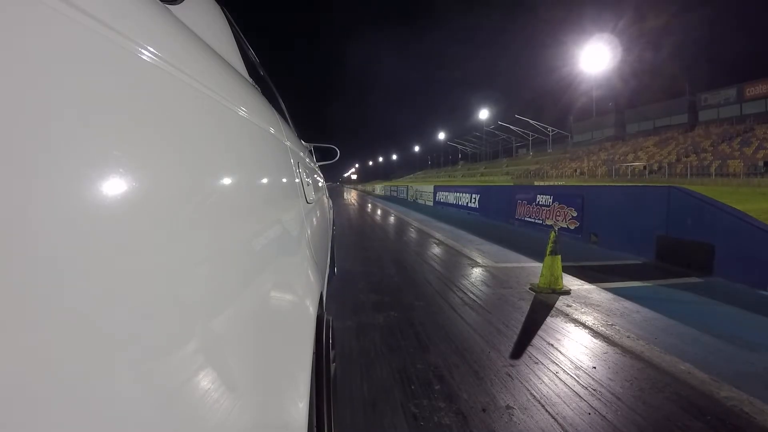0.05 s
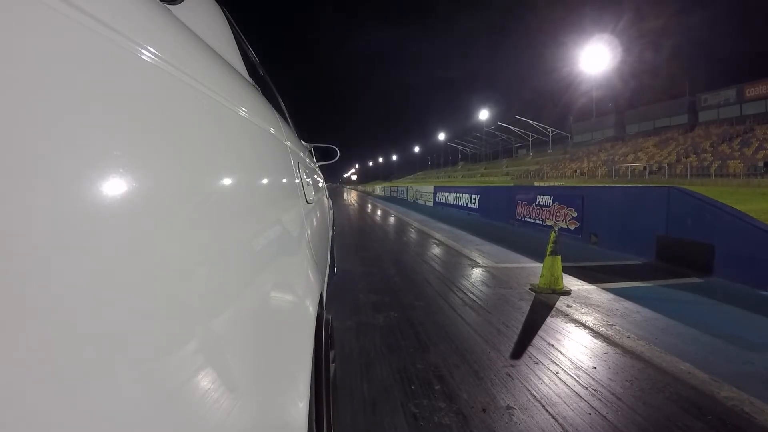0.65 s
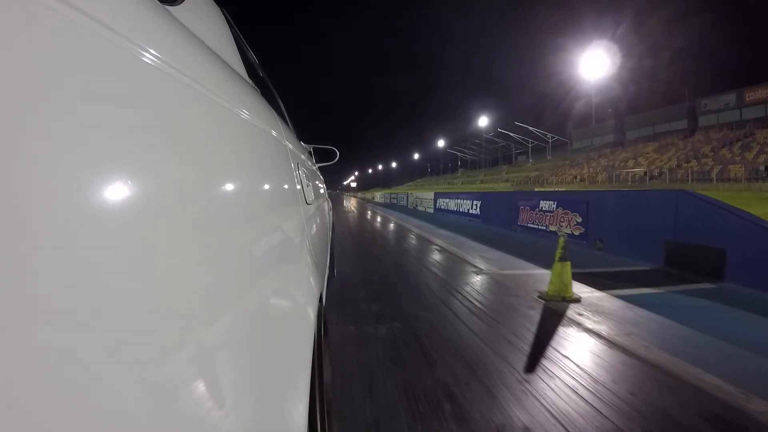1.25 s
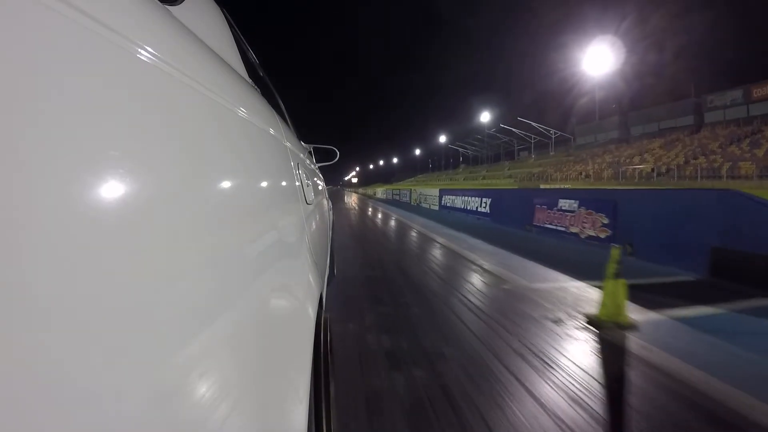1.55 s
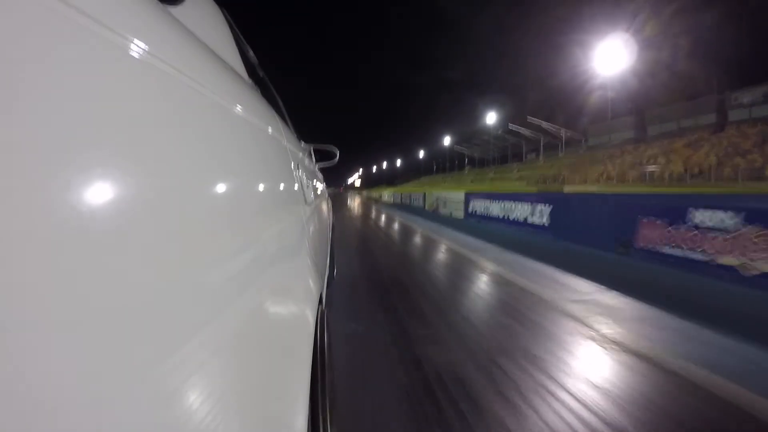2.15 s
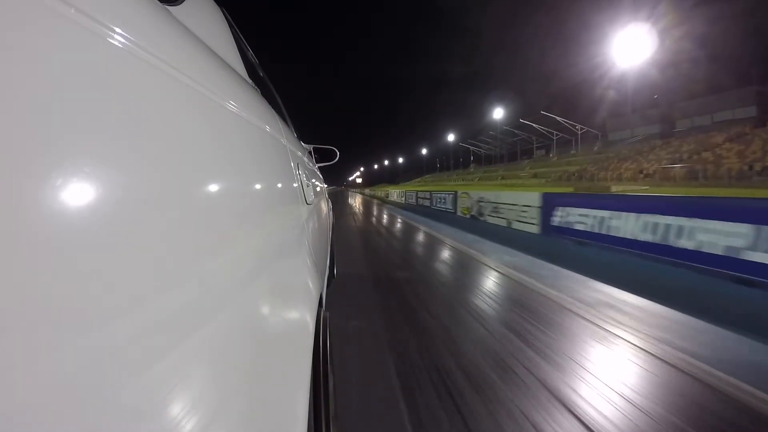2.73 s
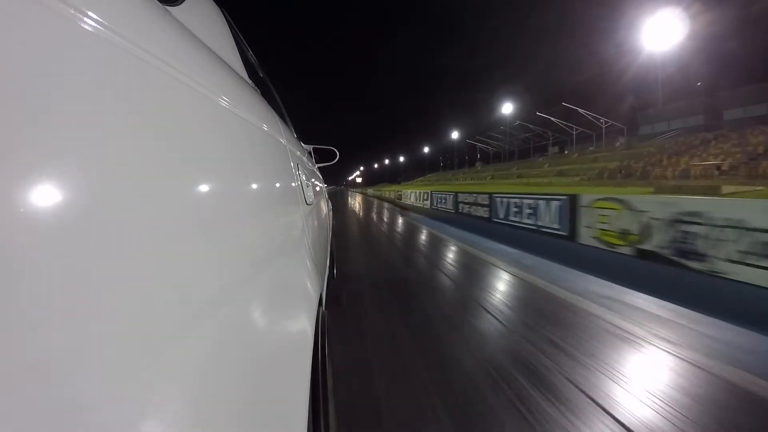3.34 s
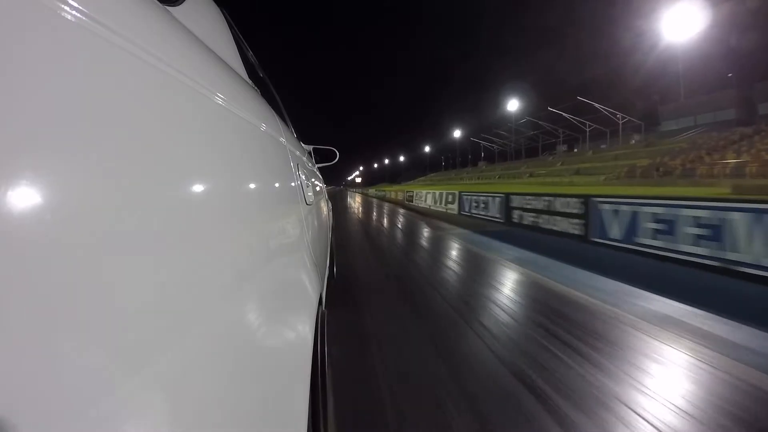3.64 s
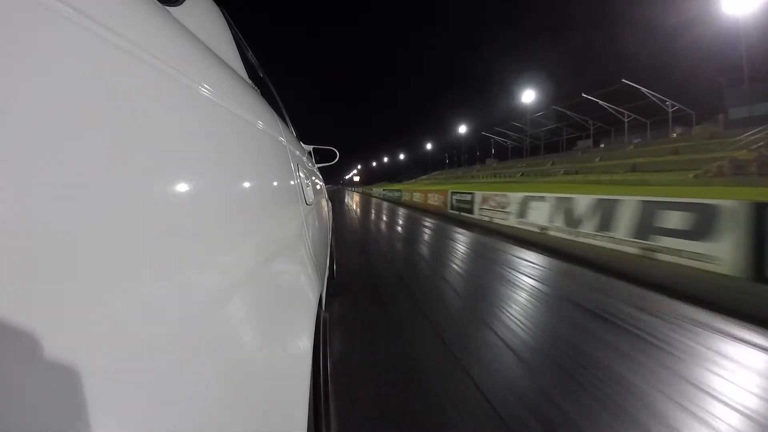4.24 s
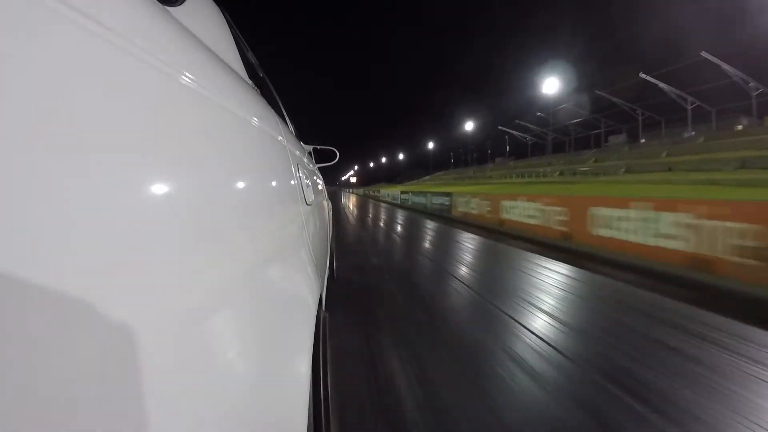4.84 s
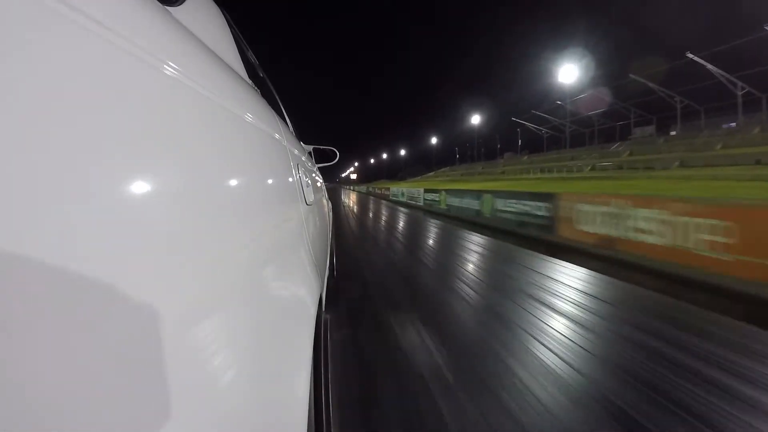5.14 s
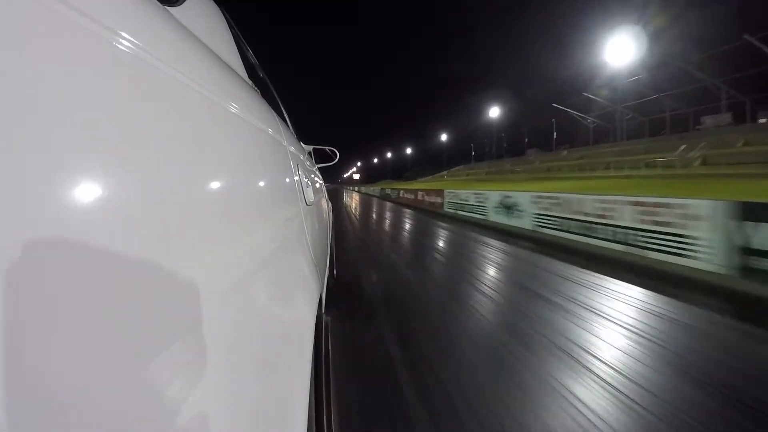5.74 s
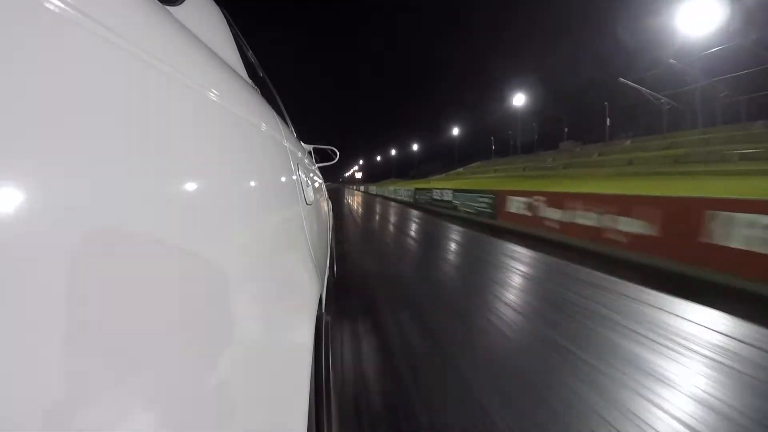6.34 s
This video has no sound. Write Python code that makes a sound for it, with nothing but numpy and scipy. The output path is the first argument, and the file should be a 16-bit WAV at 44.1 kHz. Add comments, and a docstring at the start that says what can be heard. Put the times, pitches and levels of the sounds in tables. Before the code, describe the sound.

A car engine drones, the tyres chirp, and it accelerates hard through a gear change as wind noise builds.

```python
"""A six-cylinder car launches down a drag strip, heard from a cased camera stuck on its side.
First the exhaust drones at the start line while the camera shudders on its mount.
Just after a second, a tyre sticks and slips in short chirps. Then the revs climb, a faint turbo
whistles, and growing wind buffets the camera and hisses in the resonances of its case.
Near 4.6 s the revs drop and the exhaust splutters at the gear change; a slower climb follows."""
import sys
import numpy as np
from scipy import signal
from scipy.fft import rfft, irfft
from scipy.io import wavfile
from scipy.ndimage import uniform_filter1d

SR = 44100
rng = np.random.default_rng(int(sys.argv[2]) if len(sys.argv) > 2 else 0)


def digitize_waveform(pressure):
    """Quantize a signal to 16-bit integers and store it at the path in sys.argv[1].

    Rows of a 2-D input are taken as channels; values are limited to [-1, 1].
    """
    field = np.atleast_2d(pressure).T
    bounded = np.clip(field, -1, 1)
    quanta = np.round(bounded * 32767).astype(np.int16)
    wavfile.write(sys.argv[1], SR, quanta)


N = 290178
TIME = np.arange(N) / SR
BINS_HZ = np.fft.rfftfreq(N, 1 / SR)


def gain_of(db):
    """Turns decibels into a number to multiply by."""
    return 10 ** (np.asarray(db) / 20)


def evened(x):
    """Scales a signal so that its average size (rms) is 1."""
    return x / np.sqrt(np.mean(x ** 2) + 1e-20)


def curves(rows):
    """Joins the rows of a timed table with straight lines: one curve for each column after time."""
    times, *columns = np.transpose(rows)
    return [np.interp(TIME, times, column) for column in columns]


def response(spectrum, hz):
    """Looks up how strongly a spectrum lets each frequency through."""
    points_hz, db = np.transpose(spectrum)
    return gain_of(np.interp(np.log(hz + 1), np.log(points_hz + 1), db))


def coloured(x, spectrum):
    """Filters a signal by a spectrum."""
    return irfft(rfft(x) * response(spectrum, BINS_HZ), N)


def noise(spectrum):
    """Noise of average size 1 with the given spectrum."""
    return evened(coloured(rng.standard_normal(N), spectrum))


def wander(rate_hz):
    """A random wobble of average size 1, no faster than about the given rate."""
    return evened(irfft(rfft(rng.standard_normal(N)) * np.exp(-(BINS_HZ / rate_hz) ** 2), N))


# The turbocharger's whistle: time_s, pitch_hz, level_db
TURBO_WHISTLE = [(.9, 5900, -77), (1.25, 5890, -60), (2.2, 6500, -59.5), (3.7, 6400, -53.5),
                 (3.95, 7553, -64), (4.2, 8210, -55), (4.38, 8590, -47), (4.6, 9180, -74)]

def turbo():
    """A faint, airy whistle climbs with the boost and dies at the gear change."""
    hz, db = curves(TURBO_WHISTLE)
    airy = wander(rate_hz=380) + 1j * wander(rate_hz=380)  # blurs the pure tone
    return gain_of(db) * (airy * np.exp(2j * np.pi * np.cumsum(hz) / SR)).real


# Air rushing over the camera, growing with road speed: time_s, level_db
AIR_RUSH = [(0, -37), (2.4, -22.5), (2.85, -13.5), (3.22, -9), (3.4, -11.5), (3.7, -4), (3.95, -7),
            (4.2, -3.5), (4.95, -2.5), (5.28, 1.5), (5.6, -0.5), (6.35, -1), (6.58, 1.5)]
# Wind ringing in the camera case: frequency_hz, level_db
CASE_HISS = [(300, -2), (650, -35), (900, -5.5), (1300, -7), (1900, -5), (2400, 3.5), (2900, -7),
             (3550, 0.5), (4050, -3.5), (4500, -15), (5000, -23.5), (6200, -19), (7200, -32.5),
             (12000, -42.5)]
# The wind's highest fizz: frequency_hz, level_db
CASE_FIZZ = [(3820, -32.5), (6500, -9), (7280, -5.5), (8300, 1.5), (9290, -5.5), (10100, 0), (11000, -8.5),
             (12500, -5.5), (13500, -11), (15100, -14.5)]

def wind(hiss_db=-20, fizz_db=-46, flicker_db=1.42, swell_db=0.45):
    """Air tears past the case, louder with speed; its swirls shake hiss and fizz together."""
    air_db = curves(AIR_RUSH)[0]
    swirls_db = flicker_db * wander(rate_hz=160) + swell_db * wander(rate_hz=30)
    hiss = gain_of(hiss_db) * noise(CASE_HISS)
    fizz = gain_of(fizz_db) * noise(CASE_FIZZ)
    return gain_of(air_db + swirls_db) * (hiss + fizz)


def shaking(rest_db, speed_db, air_share, launch_s=1.5, settle_db_per_s=9):
    """Strength of a shake: a tremble that settles after launch, plus a part that grows with the wind."""
    tremble = gain_of(rest_db - settle_db_per_s * np.maximum(TIME - launch_s, 0))
    air_push = gain_of(speed_db + air_share * curves(AIR_RUSH)[0])
    return np.hypot(tremble, air_push)


# The deep rumble of air and road: frequency_hz, level_db
RUMBLE = [(12, -13), (25, -3.5), (50, 3), (80, 2), (130, -4), (220, -18.5), (400, -18), (900, -48.5),
          (2000, -57.5)]

def buffet(lumpy_db=0.46):
    """Lumps of air and road rumble push on the camera."""
    strength = shaking(rest_db=-29, speed_db=-19, air_share=0.72)
    return strength * gain_of(lumpy_db * wander(rate_hz=8.5)) * noise(RUMBLE)


# Jolts that set the camera rocking: peak_s, length_s, level_db
MOUNT_JOLTS = [(0.55, 0.4, -19), (0.864, 0.29, -17), (1.082, 0.12, -19), (1.891, 0.31, -16.5),
               (2.17, 0.38, -10), (4.74, 0.16, -13), (6.52, 0.13, -13)]

def shudder(mount_hz=36, stray=0.05, uneven_db=4):
    """The camera rocks on its mount at one low pitch: unevenly with speed, swelling at each jolt."""
    rocking = shaking(rest_db=-35, speed_db=-18.5, air_share=0.7)
    rocking *= gain_of(uneven_db * wander(rate_hz=8))
    for peak_s, length_s, level_db in MOUNT_JOLTS:
        swell = np.cos(np.pi * np.clip((TIME - peak_s) / length_s, -0.5, 0.5))
        rocking = np.maximum(rocking, gain_of(level_db) * swell)
    cycles = np.cumsum(mount_hz * (1 + stray * wander(rate_hz=7.8))) / SR
    return np.sqrt(2) * rocking * np.sin(2 * np.pi * cycles)


# Tyre chirps: start_s, length_s, start_pitch_hz, end_pitch_hz, level_db, loss_per_harmonic_db
TYRE_CHIRPS = [(1.124, 0.038, 1283, 1450, -33, 3), (1.202, 0.029, 1390, 1610, -23.5, 15),
               (1.364, 0.051, 1266, 1140, -16, 7), (1.426, 0.076, 1248, 1122, -17.5, 1.5),
               (1.474, 0.062, 1348, 1211, -17.5, 12), (1.511, 0.06, 1254, 1134, -19, 1.5)]
# A squeal's harmonics (whole multiples of its pitch), before that loss: harmonic_number, level_db
SQUEAL_TONES = [(1, -0.5), (2, -6), (3, -19), (4, -29), (5, -37)]
# Rubber scuffing under each chirp: frequency_hz, level_db
RUBBER_SCUFF = [(500, -29.5), (850, -14.5), (1250, -14), (1750, -7), (2300, 15), (2850, -10), (3500, 8.5),
                (4100, 0), (4900, -18), (6200, -17.5), (8000, -29), (15000, -49)]

def tyre(jitter=0.032, rise_s=0.0032, fade_db=8, grain_db=-3, scuff_db=-6):
    """The tread sticks and slips in short, unsteady squeals over a scuffing noise."""
    waver = 1 + jitter * wander(rate_hz=620)
    grain = gain_of(grain_db * wander(rate_hz=51))
    scuff = gain_of(scuff_db) * noise(RUBBER_SCUFF)
    chirps = np.zeros(N)
    for start_s, length_s, start_hz, end_hz, level_db, loss_db in TYRE_CHIRPS:
        on = (TIME > start_s) & (TIME < start_s + length_s)
        t = TIME[on] - start_s
        cycles = np.cumsum(np.interp(t, [0, length_s], [start_hz, end_hz]) * waver[on]) / SR
        soft_ends = np.minimum(np.minimum(t, length_s - t) / rise_s, 1)
        slip = soft_ends * gain_of(level_db - fade_db * t / length_s)
        squeal = sum(gain_of(db - loss_db * (k - 1)) * np.sin(2 * np.pi * k * cycles)
                     for k, db in SQUEAL_TONES)
        chirps[on] += slip * (np.sqrt(2) * squeal + gain_of(-loss_db) * scuff[on])
    return chirps * grain


# Sound bouncing off the track, the car body and the side wall: delay_s, gain
BOUNCES = [(.0047, 0.37), (.0093, -0.094), (0.0146, -0.12), (0.0208, 0.18)]

def echoed(x):
    """Near surfaces add quick echoes, which strengthen some pitches and weaken others."""
    return x + sum(gain * np.interp(TIME - delay_s, TIME, x) for delay_s, gain in BOUNCES)


# Narrow spots where echoes add to a tone or cancel it: centre_hz, width_hz, gain_db
PEAKS_AND_DIPS = [(199, 5, -3.5), (238, 5, -10.5), (243, 2.3, 1), (323.3, 11, -5), (480.3, 7.5, -9),
                  (524.7, 3.9, -13), (716, 14, 3), (810.3, 8.4, -9.5), (850, 6.5, 3), (878.7, 5.6, -13),
                  (922, 5.3, -11), (945.3, 16, 9.5), (1029, 7.3, 5)]

def echo_gain_db(hz):
    """A tone swells and fades as its pitch slides through the peaks and dips."""
    return sum(db * np.exp(-((hz - centre) / width) ** 2) for centre, width, db in PEAKS_AND_DIPS)


# The engine's mechanical rasp: frequency_hz, level_db
ENGINE_RASP = [(710, -38.5), (1200, -13), (1450, -2.5), (1740, -6.5), (2060, -2.5), (2240, -7.5),
               (2410, -2.5), (2600, -9.5), (3920, -9), (5100, -29.5), (6440, -26.5), (7230, -34),
               (15000, -63.5)]

def rasp(fired, level_db=-35, throb=0.32):
    """Valve noise and gas hiss pulse each time a cylinder fires."""
    level = gain_of(level_db + 2 * wander(rate_hz=15))
    pulses = noise(ENGINE_RASP) * (1 + throb * np.cos(2 * np.pi * fired))
    return level * evened(echoed(pulses))


# Revs held at the line, climbing, dropping at the gear change, climbing again: time_s, firing_rate_hz
ENGINE_REVS = [(0, 138), (0.25, 144.6), (0.52, 150.9), (1.2, 165.5), (1.43, 163.9), (1.68, 173.8),
               (2.05, 179.7), (2.42, 181.1), (2.72, 197), (3.2, 238), (3.55, 272.2), (4.15, 325.4),
               (4.52, 350.3), (4.61, 330), (4.7, 295.4), (4.8, 266.5), (4.88, 266.1), (6.58, 316.2)]

def firings(jitter=0.0018):
    """The firing rate and the count of firings so far; the engine's speed trembles a little."""
    hz = curves(ENGINE_REVS)[0]
    return hz, np.cumsum(hz * (1 + jitter * wander(rate_hz=44.7))) / SR


def with_revs(hz, base_db, db_per_octave, base_hz=150):
    """A level in decibels that moves by one step each time the revs double."""
    return base_db + db_per_octave * np.log2(hz / base_hz)


# How hard the engine pulls: time_s, level_db
ENGINE_EFFORT = [(0, -0.7), (0.28, 0.5), (0.58, -2.5), (0.8, -1.3), (1.95, -1.6), (2.33, -7), (2.87, 1),
                 (4.0, -1.1), (4.45, -1), (4.72, -0.5), (4.82, -4), (5.7, -2.6), (6.3, -5), (6.58, -5)]

def effort_db():
    """The engine sags after the launch and pulls more softly in second gear."""
    return curves(ENGINE_EFFORT)[0]


# Tones from unequal cylinders: steps_from_nearest_firing_harmonic, level_db
UNEVEN_CYLINDERS = [(0, -1.5), (1, -8.5), (2, -0.5), (3, 1)]
# How the exhaust pipe colours the sound: frequency_hz, gain_db
EXHAUST_PIPE = [(40, -9.5), (170, 2), (300, 5.5), (390, -5), (455, 8), (525, 6), (600, -9), (670, -11.5),
                (730, 4), (890, 3.5), (1080, 0), (1280, -7), (3800, -24), (4700, -44.5)]

def engine_tones(hz, fired, cylinders=6, count=150, patchy_db=4, bright_above_hz=950, scatter=0.24):
    """Unequal cylinders make a tone at each multiple, or order, of the rate of one full engine cycle."""
    coarse_s, drift_s = TIME[::64], np.linspace(0, TIME[-1], 40)
    coarse_hz = np.interp(coarse_s, TIME, hz)
    firing_boost = gain_of(with_revs(hz, base_db=12.5, db_per_octave=-9))
    bright_db = with_revs(coarse_hz, base_db=-2.5, db_per_octave=6.5)  # high revs sharpen the pulses
    tones = np.zeros(N)
    for order in range(1, count):
        steps = min(order % cylinders, -order % cylinders)
        order_hz = coarse_hz * order / cylinders
        drift_db = patchy_db * np.interp(coarse_s, drift_s, rng.standard_normal(len(drift_s)))
        lift_db = bright_db * np.clip(np.log2(order_hz / bright_above_hz), 0, 1)
        level_db = UNEVEN_CYLINDERS[steps][1] + drift_db + lift_db + echo_gain_db(order_hz)
        level = np.interp(TIME, coarse_s, response(EXHAUST_PIPE, order_hz) * gain_of(level_db))
        slip = scatter * np.sqrt(order / 20) * rng.standard_normal()  # high tones fall out of step
        tone = level * np.cos(2 * np.pi * (fired * order / cylinders + slip))
        if steps:
            tones += tone
        elif order > len(DRONE_TONES) * cylinders:  # the drone plays the lowest firing harmonics
            tones += firing_boost * tone
    return tones


def steadied(x, band_hz=(700, 1080)):
    """Evens out slow changes of level, holding the pipe's main resonance at size 1."""
    band = signal.sosfilt(signal.butter(3, band_hz, "band", fs=SR, output="sos"), x)
    power = uniform_filter1d(uniform_filter1d(band ** 2, size=22000), size=22000)
    return x / np.sqrt(power + 1e-12)


# How noisy the exhaust is; it splutters at the gear change: time_s, roughness_0_to_1
ROUGHNESS = [(0, 0), (1.2, 0.24), (2.3, 0.31), (3.2, 0.45), (4.5, 0.32), (4.68, 0.65), (4.9, 0.24),
             (6.58, 0.03)]

def snarl(hz, fired, split_hz=580, unsteady=0.14, effort_share=0.51):
    """Engine tones and puffs of gas leave the pipe: a low burble with a snarl above it."""
    rough = curves(ROUGHNESS)[0]
    tones = engine_tones(hz, fired) * (1 + unsteady * wander(rate_hz=140))  # no two burns are alike
    puffs = coloured(rng.standard_normal(N) * (1 + 0.5 * np.cos(2 * np.pi * fired)), EXHAUST_PIPE)
    blend = np.sqrt(1 - rough ** 2) * steadied(tones) + rough * steadied(puffs)
    gas = steadied(echoed(blend))
    low = signal.sosfiltfilt(signal.butter(8, split_hz, fs=SR, output="sos"), gas)
    burble = low * gain_of(with_revs(hz, base_db=-25.5, db_per_octave=0.35))
    high = (gas - low) * gain_of(with_revs(hz, base_db=-25.5, db_per_octave=0.47))
    return gain_of(effort_share * effort_db()) * (burble + high)


# The boom of the tailpipe: frequency_hz, gain_db
TAILPIPE_BOOM = [(140, -12), (176, -10.5), (212, -12.5), (249, -10), (272, -16), (302, -10.5), (357, -13.5),
                 (386, -25.5), (412, -25), (430, -16), (453, -10), (492, -15.5), (540, -14), (557, -29),
                 (668, -31.5), (718, -23), (892, -19), (945, -28), (1052, -29)]
# Tones at one, two and three times the firing rate: level_db, share_of_effort_followed
DRONE_TONES = [(0.5, 1), (-5, .7), (-6, 0.58)]
# The second tone wavers while the car is held at the line: time_s, extra_db
SECOND_TONE_WAVER = [(0, 3.5), (0.25, 0.5), (0.55, -4), (0.85, 0), (1.25, 4), (1.7, -2.5), (2.2, -0.5)]

def drone(hz, fired, flutter=0.039):
    """Three low, nearly pure tones swell and fade as the revs sweep them through the tailpipe's boom."""
    tones = np.zeros(N)
    for k, (db, share) in enumerate(DRONE_TONES, 1):
        level_db = db + share * effort_db() + echo_gain_db(k * hz)
        if k == 2:
            level_db += curves(SECOND_TONE_WAVER)[0]
        level = response(TAILPIPE_BOOM, k * hz) * gain_of(level_db)
        tremble = 1 + flutter * k * wander(rate_hz=62)
        tones += level * tremble * np.sin(2 * np.pi * k * fired)
    return np.sqrt(2) * tones


def scene():
    """Engine, tyre, wind and the shaking mount add up at one microphone."""
    hz, fired = firings()
    engine = drone(hz, fired) + snarl(hz, fired) + rasp(fired) + turbo()
    soft_ends = signal.windows.tukey(N, 0.002)
    return (soft_ends * (engine + tyre() + wind() + buffet() + shudder()))[None]


def record(dry, knee=0.87, headroom=0.17, top_hz=15289):
    """Rounds off the tallest peaks, then removes the very highest treble."""
    held = np.clip(dry, -knee, knee)
    rounded = held + headroom * np.tanh((dry - held) / headroom)
    low_pass = signal.firwin(511, top_hz, window=("kaiser", 9), fs=SR)
    return signal.oaconvolve(rounded, low_pass[None], "same")


dry = scene()
out = record(dry)
digitize_waveform(out)
```